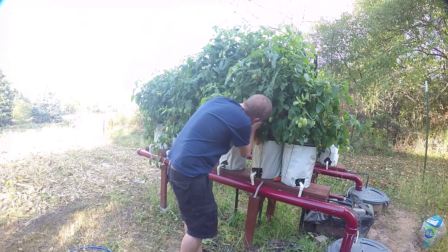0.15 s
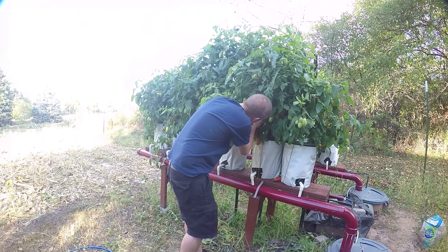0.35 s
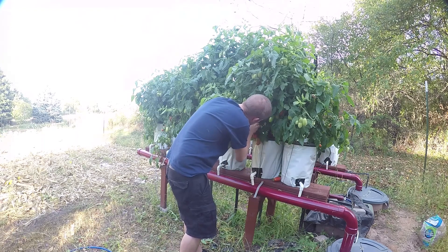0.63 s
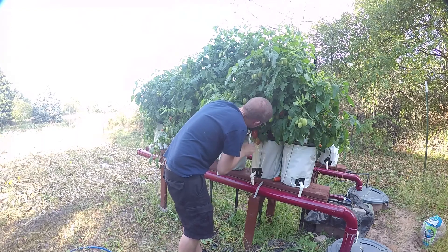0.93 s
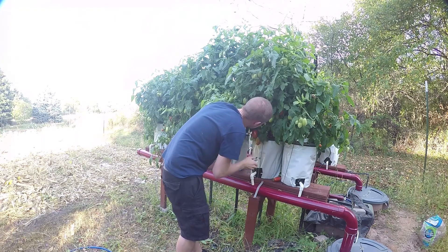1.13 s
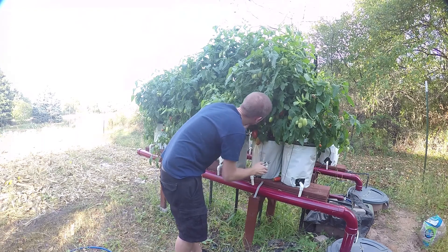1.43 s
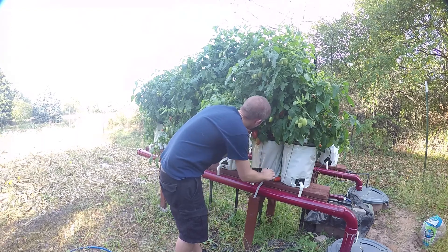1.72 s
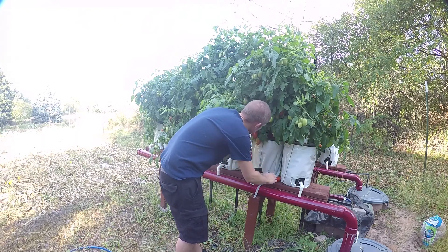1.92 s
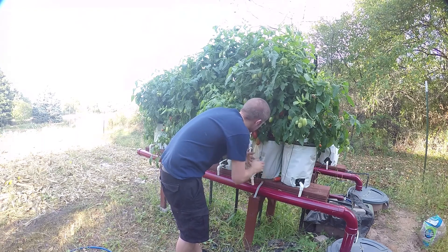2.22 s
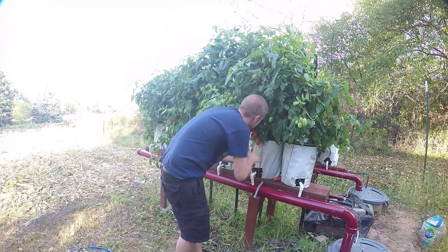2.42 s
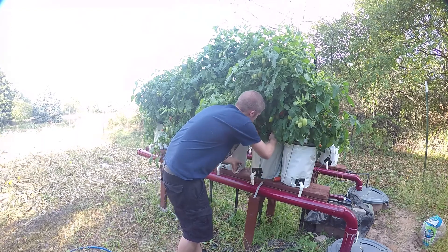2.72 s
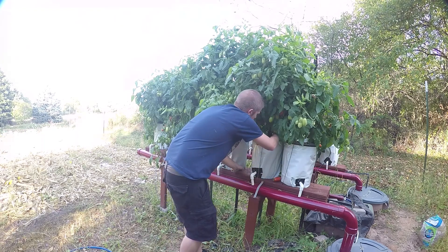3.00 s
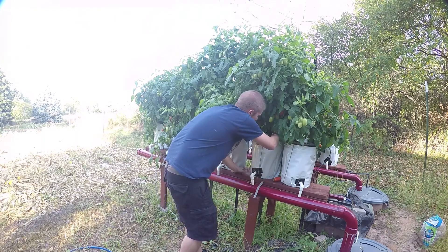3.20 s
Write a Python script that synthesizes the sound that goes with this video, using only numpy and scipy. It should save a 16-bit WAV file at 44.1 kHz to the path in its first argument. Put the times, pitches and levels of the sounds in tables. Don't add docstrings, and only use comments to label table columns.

```python
import sys
import numpy as np
from scipy import signal
from scipy.fft import rfft, irfft
from scipy.io import wavfile
from scipy.ndimage import uniform_filter1d

SR = 44100
rng = np.random.default_rng(int(sys.argv[2]) if len(sys.argv) > 2 else 0)


def invert_db(level):
    return 10 ** (np.asarray(level, dtype=float) / 20)


def put_to_file(sound):
    columns = np.atleast_2d(sound).T
    safe = np.clip(columns, -1, 1)
    whole_steps = np.round(safe * 32767)
    wavfile.write(sys.argv[1], SR, whole_steps.astype(np.int16))


N = 147735
EDGE_HZ = 15300
TIME = np.arange(N) / SR


def read(points, hz):
    f, value = np.transpose(points)
    return np.interp(np.log(hz + 1), np.log(f + 1), value)


def add(mix, s, sound):
    part = mix[:, round(s * SR):][:, :sound.shape[1]]
    part += sound[:, :part.shape[1]]


def sides(db):
    return invert_db(np.array([[db / 2], [-db / 2]]))


def drift(hz, shape):
    spectrum = rfft(rng.standard_normal(shape + (N // 64 + 2,)))
    bin_hz = np.arange(spectrum.shape[-1]) * SR / N
    slow = irfft(spectrum * np.exp(-(bin_hz / hz) ** 2))
    slow = slow / slow.std(-1, keepdims=True)
    rows = slow.reshape(-1, slow.shape[-1])
    return np.array([np.interp(np.arange(N) / 64, np.arange(len(row)), row) for row in rows])


def noise(gain, same, size=N):
    hz = np.fft.rfftfreq(size, 1 / SR)
    left, other = rfft(rng.standard_normal((2, size)))
    shared = np.clip(same(hz), 0, 1)
    right = shared * left + np.sqrt(1 - shared ** 2) * other
    level = invert_db(gain(hz) - 40 * (hz > EDGE_HZ))
    return irfft(np.array([left, right]) * level, size) * np.sqrt(SR / 2)


def ring(modes, gains, factor=1., rise=.0004):
    t = np.arange(4410) / SR
    hz, db, t60 = np.transpose(modes)[:, :, None]
    envelope = np.minimum(t / rise, 1) * invert_db(db - 60 * t / t60)
    return gains @ (envelope * np.sin(2 * np.pi * hz * factor * t))


# [f/Hz, likeness]
LIKENESS = [(60, 1.7), (300, .99), (700, 1.05), (1400, 0.94), (3000, 0.74), (6000, -0.3), (15000, -0.1)]


def likeness(hz):
    return read(LIKENESS, hz)


# [f/Hz, level/dB per Hz]
RUMBLE = [(40, -76), (65, -66), (105, -59.5), (128, -60.5), (155, -67.5), (250, -74.5), (430, -76),
          (700, -83.5)]
# [f/Hz, level/dB per Hz]
AIR = [(300, -83), (800, -85.5), (1600, -86.5), (2700, -86.5), (3200, -90.5), (4400, -92), (6000, -100),
       (15300, -101)]
# [f/Hz, level/dB]
LEAF_COLOUR = [(2000, -21.5), (4500, 1.5), (6000, -5.5), (7500, -2.5), (9300, -0.5), (11500, -4.5),
               (14000, -13), (16000, -19)]
PATCH_EDGES = [0, 5200, 7000, 8800, 10500, 12500, 22050]
# [t/s, level/dB]
STIR = [(0.0, -56.5), (0.26, -56.5), (0.48, -54), (0.74, -55.5), (1.61, -55.5), (2.0, -57.5), (2.88, -56.5),
        (3.03, -57), (3.35, -57)]


def background():
    low = noise(lambda hz: read(RUMBLE + [(3000, -130)], hz) - 40 * (hz < 12), likeness)
    air = noise(lambda hz: read([(60, -120)] + AIR, hz), likeness)
    air = air * invert_db(.8 * drift(34, (1,)))

    leaf_db, swell_db, flicker_db = -91, 0.7, 2
    stir = np.interp(TIME, *np.transpose(STIR)) + 58
    swell = swell_db * drift(5.4, (1,))
    common = 0.61 * drift(48, (1,))
    separate = 0.59 * drift(40, (len(PATCH_EDGES) - 1,))
    patch_db = stir + swell + flicker_db * (common + separate)
    leaf = np.zeros((2, N))
    for lo, hi, db in zip(PATCH_EDGES, PATCH_EDGES[1:], patch_db):
        patch = noise(lambda hz: leaf_db + read(LEAF_COLOUR, hz) - 99 * ((hz < lo) | (hz >= hi)), likeness)
        leaf += patch * invert_db(db)
    return low + air + leaf


# [t/s, level/dB per Hz]
WIND = [(0, -46.5), (.2, -48), (.32, -47), (.5, -53), (.6, -50.5), (.9, -58), (1.01, -37.5), (1.08, -52),
        (1.4, -47.5), (1.6, -52), (3.35, -60)]


def wind():
    def colour(hz):
        above = -10 * np.log10(1 + (hz / 29.8) ** 6)
        below = -10 * np.log10(1 + (9 / (hz + 1)) ** 4)
        return above + below

    puff = noise(colour, lambda hz: 0.46 + 0 * hz)
    return puff * invert_db(np.interp(TIME, *np.transpose(WIND)) + 3.45 * drift(8.8, (1,)))


# [multiple, level/dB]
LOW_ORDERS = [(1, -19), (2, 0), (3, -19), (4, -5.5), (5, -23.5), (6, -8), (7, -19.5), (8, -13.5), (9, -23),
              (10, -18), (11, -26), (12, -30.5), (13, -29), (14, -31.5), (15, -28), (16, -24), (17, -38),
              (18, -30.5), (19, -29), (20, -27.5), (21, -26.5), (22, -35.5), (23, -28), (24, -37.5),
              (25, -23), (26, -34.5), (27, -35), (28, -34.5), (29, -26), (30, -36)]
# [f/Hz, level/dB rms]
BUZZ = [(990.5, -64), (1050, -60.5), (1260, -57.5), (1443, -63), (1502, -62), (1798, -63.5), (1922, -62.5),
        (2250, -68), (2702, -64), (2821, -65), (3418, -66), (3720, -67), (3903, -65), (4081, -67),
        (4199, -69), (4323, -66)]
# [f/Hz, level/dB]
FAINT = [(900, -63), (1500, -74.5), (2900, -72), (3100, -88), (4200, -83), (4800, -109)]


def hum():
    stroke_hz, hum_db, odd_db, scatter_db = 30.007, -29.5, -3.5, 3.5
    k = np.arange(1, 161)
    db = read(FAINT, k * stroke_hz) + odd_db * (k % 2) + scatter_db * rng.standard_normal(len(k))
    db[:len(LOW_ORDERS)] = hum_db + np.transpose(LOW_ORDERS)[1]
    buzz_hz, buzz_db = np.transpose(BUZZ)
    db[np.rint(buzz_hz / stroke_hz).astype(int) - 1] = buzz_db
    db[0] -= 8

    knock_s, knock_rad, swing_rad, locked = .0265, 0.61, 1.18, 10
    struck = knock_rad + swing_rad * ((k == 2) * 1. - (k == 4)) + np.pi * (k == 9)
    phase = np.where(k <= locked, struck, 2 * np.pi * rng.random(len(k)))
    turn = np.arange(4096) / 4096
    waves = np.sqrt(2) * invert_db(db)[:, None] * np.cos(2 * np.pi * k[:, None] * turn + phase[:, None])

    strokes = (TIME - knock_s) * stroke_hz
    groups = [np.interp(strokes, turn, waves[g::4].sum(0), period=1) for g in range(4)]
    wobble = invert_db(0.39 * drift(14, (4,)))
    return (groups * wobble).sum(0) * np.ones((2, 1))


# [t/s, pitch f/Hz, level/dB, octave level/dB]
GROAN = [
    (2.055, 290.5, -55, -60),
    (2.066, 292, -33, -44),
    (2.082, 293, -30.5, -44),
    (2.1, 293, -34, -43),
    (2.122, 293, -35, -40),
    (2.133, 290, -40, -47),
    (2.144, 285, -35, -56),
    (2.156, 272, -38, -62),
    (2.17, 265, -60, -70),
]


def groan():
    s, *columns = np.transpose(GROAN)
    hz, db, octave_db = (np.interp(TIME, s, column) for column in columns)
    gate = np.interp(TIME, [s[0] - .01, s[0], s[-1], s[-1] + .01], [0, 1, 1, 0])
    pitch = (np.arange(N) >= s[0] * SR) * (hz + 1.5 * drift(40, (1,))[0])
    turn = 2 * np.pi * np.cumsum(pitch) / SR - .2
    rough = invert_db(1.4 * drift(60, (1,))[0])
    return gate * rough * (invert_db(db) * np.cos(turn) + invert_db(octave_db) * np.cos(2 * turn))


# [t/s, level/dB, f/Hz]
TWIGS = [
    (2.308, -47, 4750),
    (2.354, -46, 4900),
    (2.528, -48, 5000),
    (1.52, -47, 5200),
]


def twigs():
    out = np.zeros((2, N))
    t60 = .04
    for s, db, hz in TWIGS:
        modes = [(hz, db, t60), (1.08 * hz, db - 3, t60)]
        add(out, s, ring(modes, np.array([[1, 1], [1, -.5]])))
    return out


def burst(db, rise, t60, focus_hz, narrow_db=14):
    def colour(hz):
        return read(LEAF_COLOUR, hz) - 36 - narrow_db * np.log2((hz + 1) / focus_hz) ** 2

    t = np.arange(6000) / SR
    hiss = noise(colour, likeness, size=6000)
    grain = uniform_filter1d(rng.standard_normal(6000), size=64) * 8
    return hiss * np.minimum(t / rise, 1) * invert_db(db - 60 * t / t60 + 3 * grain)


# [t/s, peak level/dB, strongest f/Hz, t60/s]
BRUSHES = [(0.0354, -44, 4820, 0.06), (0.0504, -39, 7070, 0.06), (0.1306, -38.5, 10800, 0.054),
           (0.2299, -40, 7110, 0.06), (0.2974, -43, 8820, 0.06), (0.374, -37, 9690, 0.06),
           (0.6908, -38, 8140, 0.065), (0.7984, -43, 9130, 0.06), (0.8859, -40, 8220, 0.06),
           (0.9374, -41, 9510, 0.06), (0.9857, -42, 4500, 0.06), (1.0124, -42, 9120, 0.06),
           (1.0474, -44, 5050, 0.06), (1.2894, -42, 10200, 0.054), (1.3428, -38.5, 8900, 0.064),
           (1.3944, -40, 4500, 0.06), (1.4544, -43, 9150, 0.06), (1.4844, -42, 8770, 0.06),
           (1.5284, -39, 5310, 0.06), (1.5494, -40, 9200, 0.06), (1.6242, -41, 7550, 0.06),
           (1.6994, -43, 4510, 0.06), (1.7694, -40, 8320, 0.06), (1.8874, -44, 4640, 0.06),
           (1.9929, -40.5, 8220, 0.06), (2.0774, -42, 8300, 0.06), (2.1914, -44, 4650, 0.06),
           (2.2233, -39.5, 11200, 0.06), (2.3094, -42, 7320, 0.06), (2.3364, -42, 7560, 0.06),
           (2.3544, -39, 4850, 0.066), (2.3797, -41, 9720, 0.06), (2.3944, -39, 10400, 0.06),
           (2.4294, -43, 4500, 0.06), (2.4828, -39, 8730, 0.06), (2.5232, -38, 11600, 0.06),
           (2.588, -44, 8190, 0.06), (2.6204, -44, 9390, 0.055), (2.6594, -47, 10000, 0.06),
           (2.6994, -41, 9880, 0.068), (2.7267, -35, 9120, 0.067), (2.8274, -41, 4900, 0.06),
           (2.8424, -39, 9360, 0.068), (2.9377, -40, 5170, 0.06), (3.0004, -39.5, 7380, 0.071),
           (3.0495, -38.5, 8920, 0.06), (3.0744, -43, 9940, 0.06)]


def leaves():
    out = np.zeros((2, N))
    rise_s = .002
    for s, db, focus_hz, t60 in BRUSHES:
        add(out, s - rise_s, sides(1.5) * burst(db - 3.5, rise_s, t60, focus_hz, narrow_db=24))
    return out


def tick(db):
    t = np.arange(2000) / SR
    snap = rng.standard_normal(2000) + 1.1 * rng.standard_normal((2, 2000))
    return snap * np.minimum(t * 600, 1) * invert_db(db - 60 * t / 0.05)


# [f/Hz, level/dB, t60/s]
TUB = [(385, 0, 0.05), (700, 0.5, .035), (854, -7, 0.022), (1350, -9, 0.025), (2460, -11, 0.025)]
# [t/s, level/dB, pitch factor, rustle level/dB]
DROPS = [
    (.5713, -25, 1, -37),
    (.586, -32, 0.92, -42),
    (.605, -35, 1.3, -48),
    (.613, -34, 1.25, -46),
    (.625, -38, 1.2, -52),
    (.6578, -33, 1.1, -53),
    (1.62, -34, 1.27, -50),
]


def fruit():
    out = np.zeros((2, N))
    for s, db, factor, rustle_db in DROPS:
        add(out, s, invert_db(db) * ring(TUB, -np.ones((2, len(TUB))), factor, rise=.0009))
        add(out, s - .002, burst(rustle_db, 0.0048, 0.07, 9200))
        add(out, s + .001, tick(rustle_db))
    return out


# [t/s, level/dB, strongest f/Hz, left minus right level/dB]
CONTACTS = [(0.4305, -8.5, 10300, 11), (.4325, 1, 8570, 7.5), (0.4323, -3, 2650, -3),
            (.4331, 0.5, 10100, 2.5), (.4330, -9.5, 4750, 3), (0.4362, -23, 2050, 6), (.4359, -3, 8300, -2),
            (.4358, -8, 12600, 5), (.4362, -8, 4950, 0), (0.4368, -8, 6500, 4), (.4386, -13, 9900, 9),
            (0.4402, -17, 7100, -2), (0.442, -16, 9500, 0), (0.4457, -27, 5360, -1)]
# [f/Hz, t60/s, level/dB at any contact]
BLADES = [(1950, .014, -16), (2400, .01, -7), (3050, .008, -8), (4550, .011, 0), (4900, .008, 0),
          (5250, .008, -2), (6100, .011, 3), (6930, .01, 3), (7900, .007, 0), (8640, .008, 2),
          (9400, .007, 0), (10230, .009, 2), (11600, .007, 4), (13300, .006, 5)]


def shears():
    snip_db, scatter_db, focus_octaves, spread_db, detune = -9, 1, 0.16, -15.5, 0.01
    out = np.zeros((2, N))
    hz, t60, open_db = np.transpose(BLADES)
    luck = rng.standard_normal((len(CONTACTS), 4, len(BLADES)))
    for (s, db, focus_hz, pan_db), (sign, bend, *scatter) in zip(CONTACTS, luck):
        focus = invert_db(-6 * (np.log2(hz / focus_hz) / focus_octaves) ** 2)
        reach = focus + invert_db(spread_db + open_db)
        gains = np.sign(sign) * reach * invert_db(snip_db + db + scatter_db * np.array(scatter))
        modes = np.transpose([hz * (1 + detune * bend), 0 * hz, t60])
        add(out, s, sides(pan_db) * ring(modes, gains))

    echo_db, echo_t60 = -11, 0.055
    t = np.arange(SR // 8) / SR
    envelope = np.minimum(t / 0.0017, 1) * invert_db(echo_db - 60 * t / echo_t60)
    tail = rng.standard_normal((2, len(t))) * envelope / np.sqrt(echo_t60 * SR / 14)
    out = out + signal.fftconvolve(out, tail, axes=1)[:, :N]

    far = burst(-38, .012, 0.4, 10200)
    clack = invert_db(-36.5) * ring(TUB, np.ones((2, len(TUB))), 1.1)
    add(out, CONTACTS[1][0], far + np.pad(clack, ((0, 0), (0, 1590))))
    return out


def scene():
    return background() + wind() + hum() + groan() + twigs() + leaves() + fruit() + shears()


def band_limit(x):
    return signal.sosfilt(signal.butter(12, 15340, fs=SR, output="sos"), x)


# [f/Hz, level/dB]
TILT = [(60, -0.5), (130, -0.5), (290, 0.5), (640, -0.5), (1410, 2), (3100, 0), (6820, 2.5), (15000, 5)]


def record(dry):
    hz = np.fft.rfftfreq(N, 1 / SR)
    lag_s = .00004
    phase = .045 + np.pi * lag_s * hz / (1 + (hz / 10500) ** 4)
    port = invert_db(read(TILT, hz) / 2) * np.exp(1j * phase)
    mix = irfft(rfft(dry) * np.array([port, 1 / port]) * invert_db(-24 * (hz > EDGE_HZ)), N)
    return band_limit(np.clip(mix, -1, 1))


dry = scene()
out = record(dry)
put_to_file(out)
```